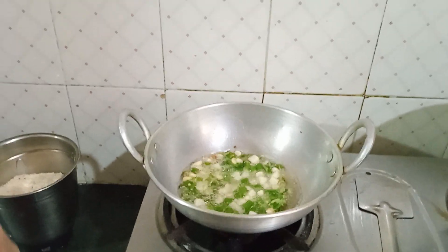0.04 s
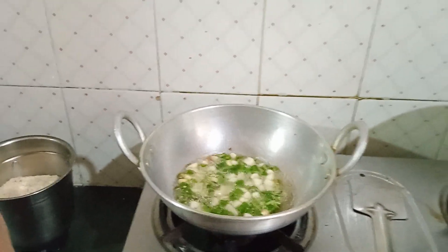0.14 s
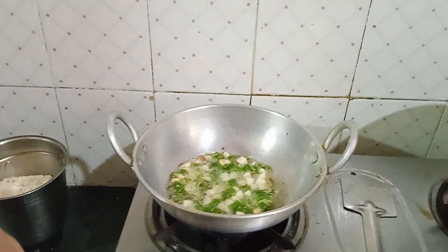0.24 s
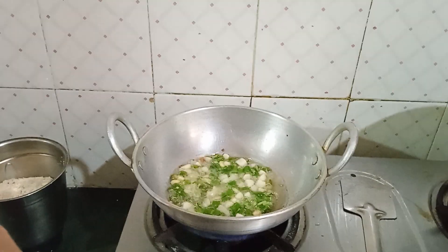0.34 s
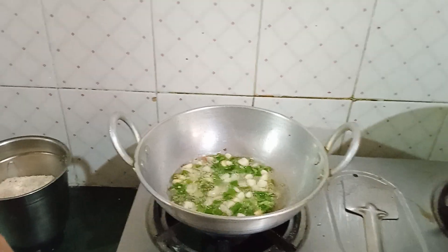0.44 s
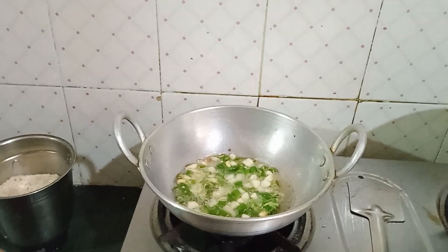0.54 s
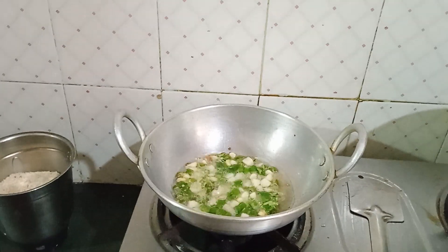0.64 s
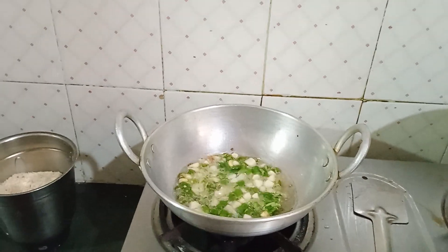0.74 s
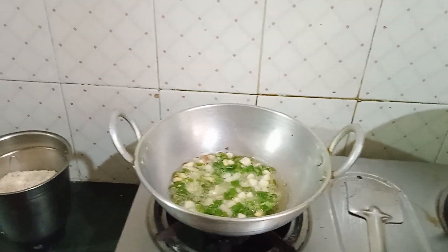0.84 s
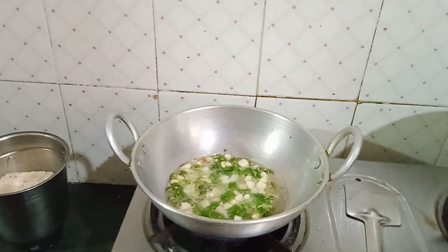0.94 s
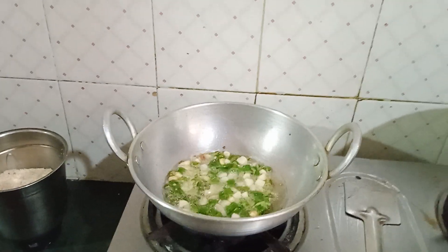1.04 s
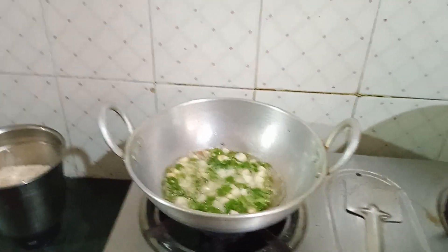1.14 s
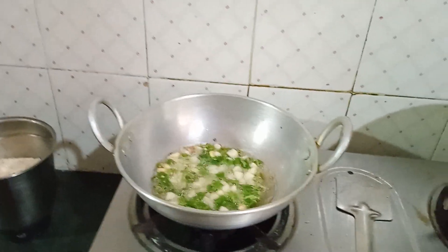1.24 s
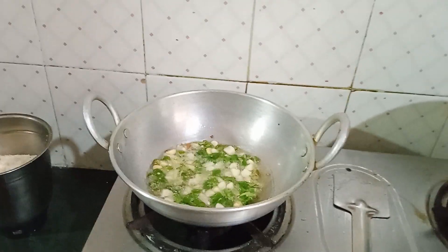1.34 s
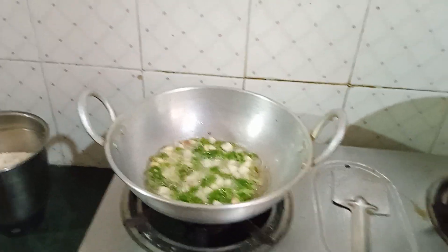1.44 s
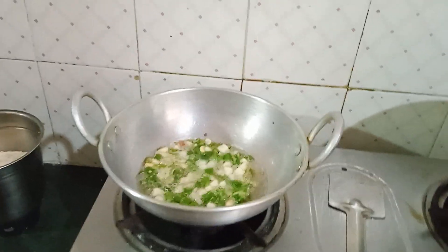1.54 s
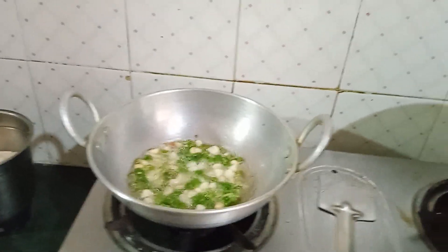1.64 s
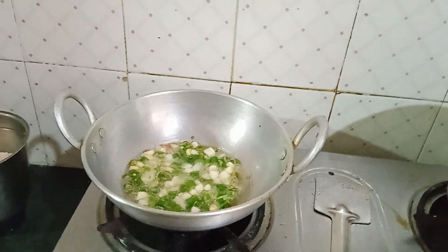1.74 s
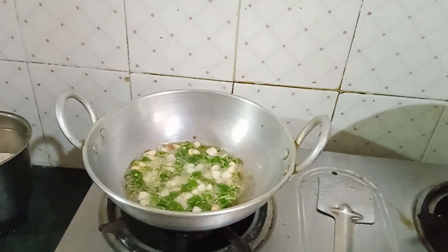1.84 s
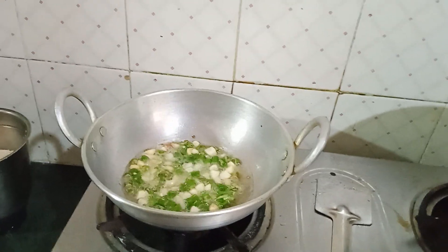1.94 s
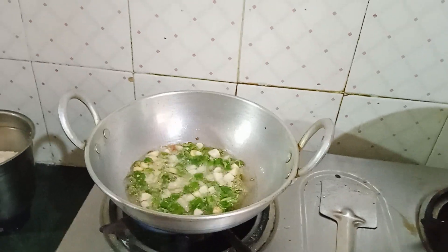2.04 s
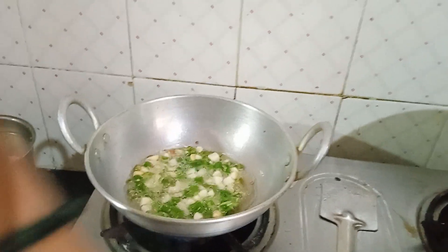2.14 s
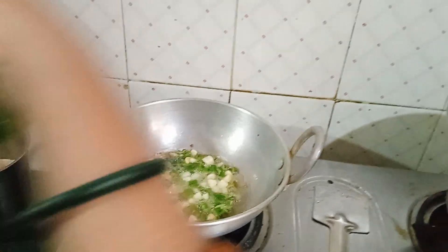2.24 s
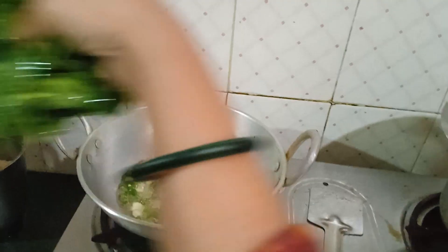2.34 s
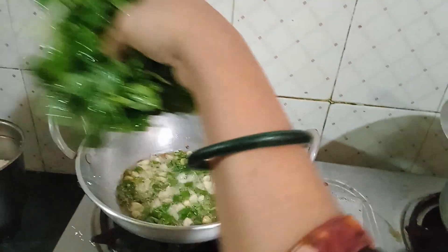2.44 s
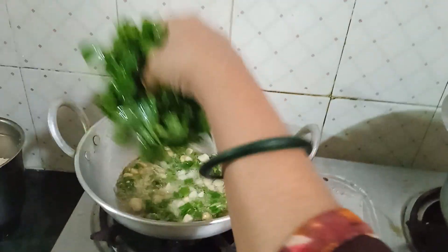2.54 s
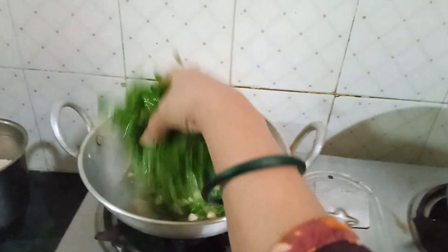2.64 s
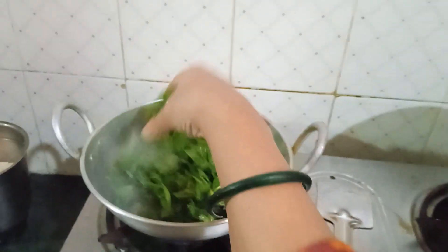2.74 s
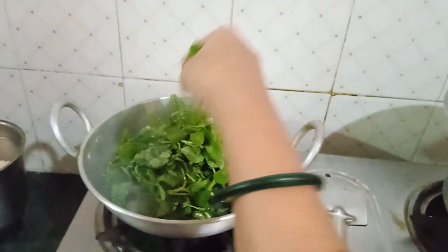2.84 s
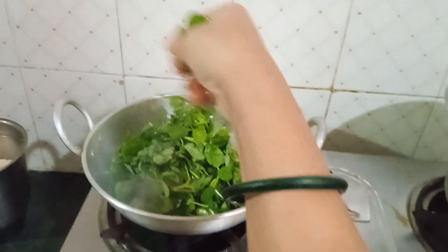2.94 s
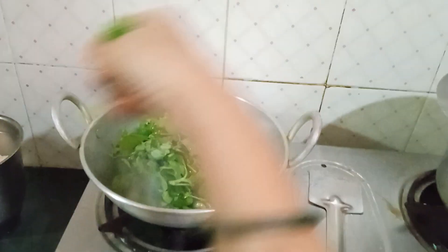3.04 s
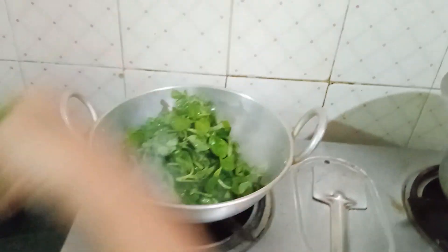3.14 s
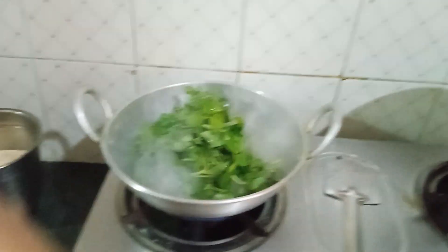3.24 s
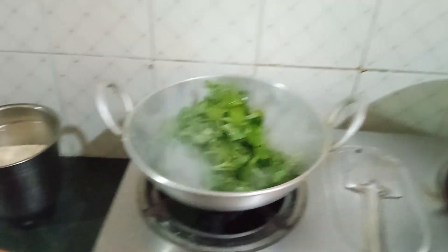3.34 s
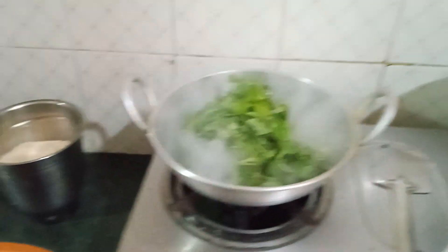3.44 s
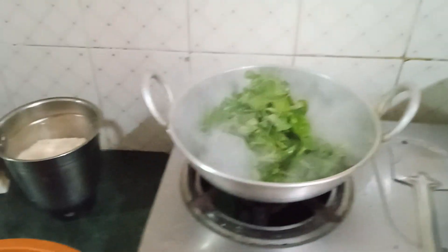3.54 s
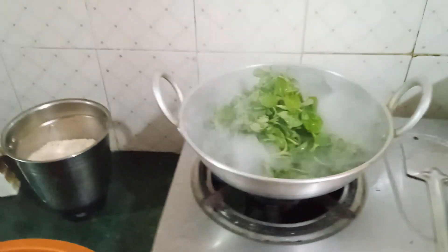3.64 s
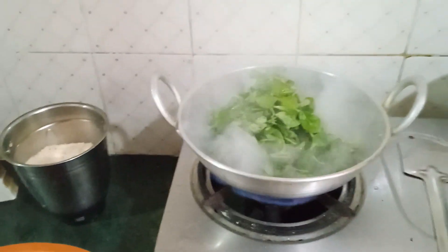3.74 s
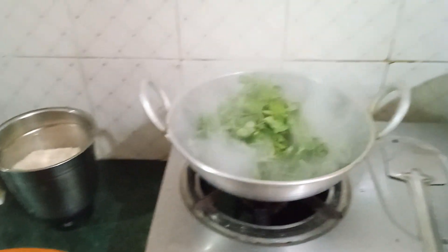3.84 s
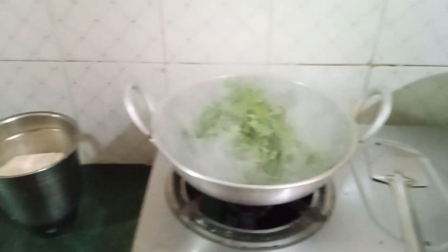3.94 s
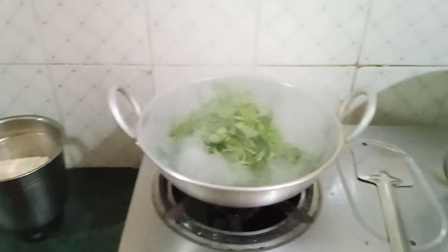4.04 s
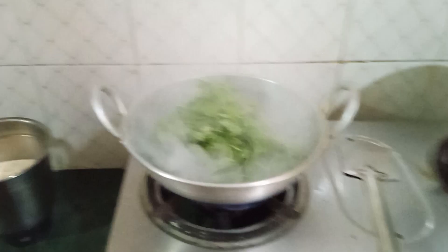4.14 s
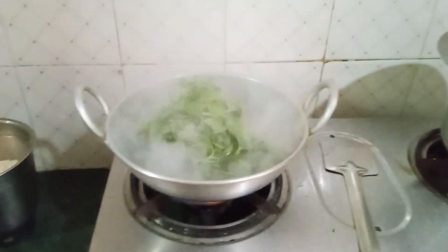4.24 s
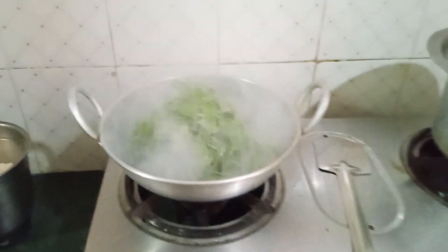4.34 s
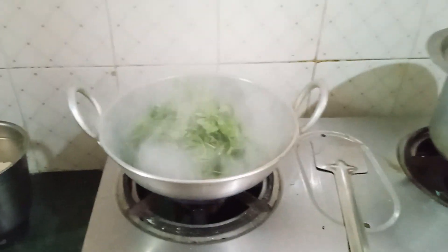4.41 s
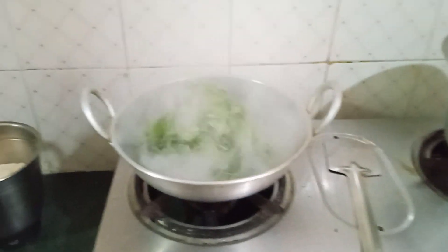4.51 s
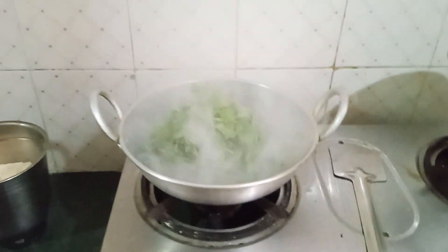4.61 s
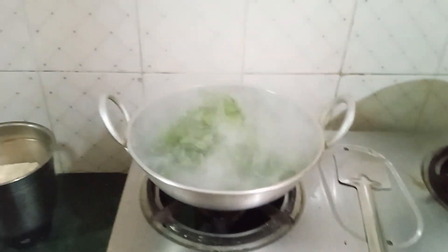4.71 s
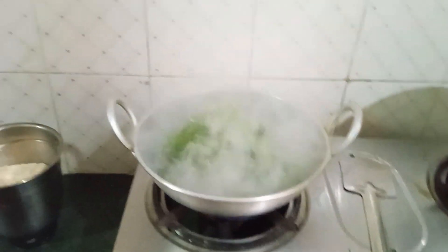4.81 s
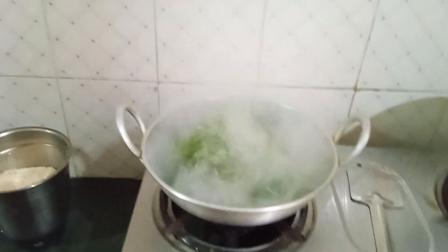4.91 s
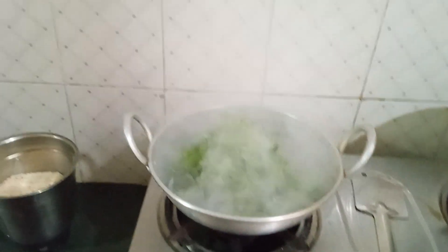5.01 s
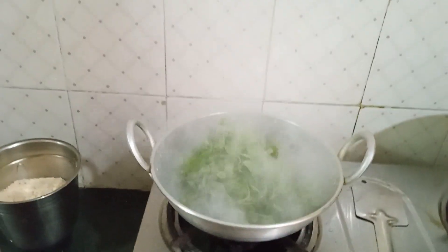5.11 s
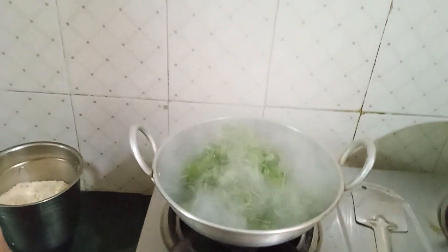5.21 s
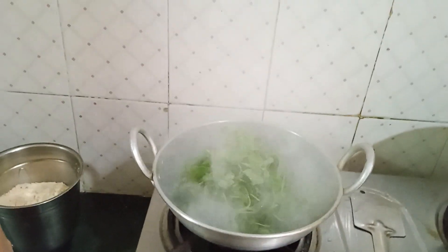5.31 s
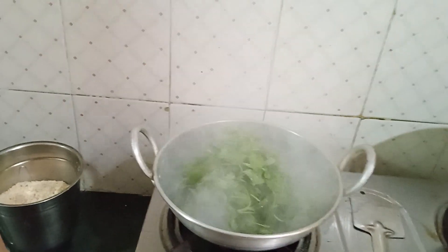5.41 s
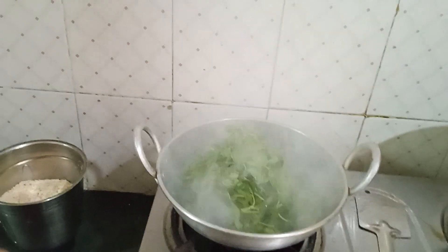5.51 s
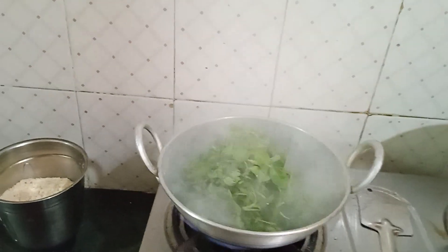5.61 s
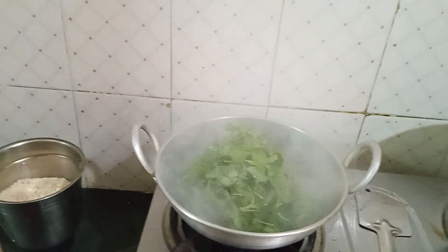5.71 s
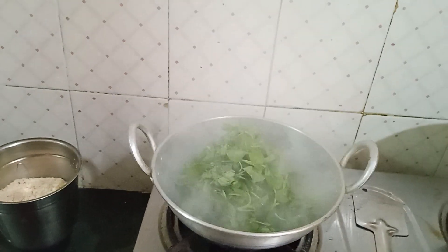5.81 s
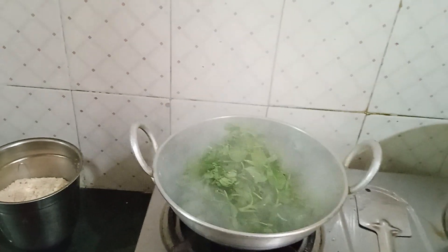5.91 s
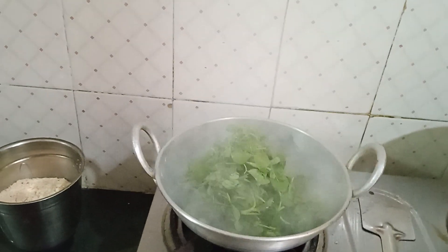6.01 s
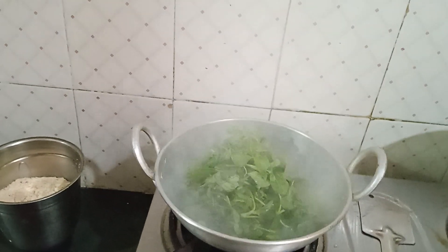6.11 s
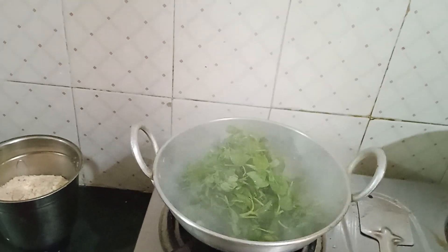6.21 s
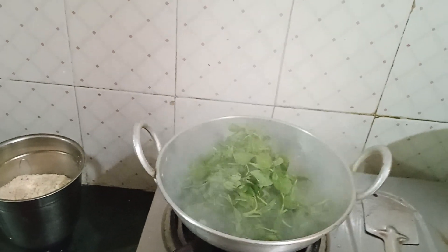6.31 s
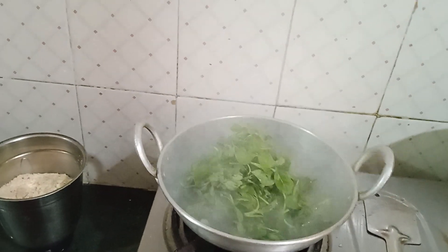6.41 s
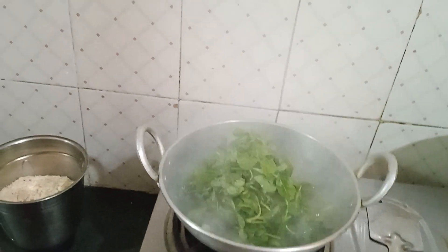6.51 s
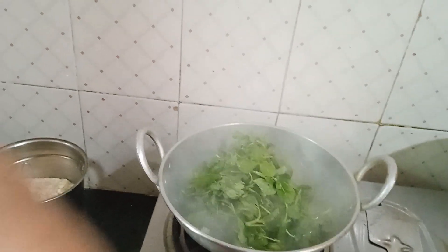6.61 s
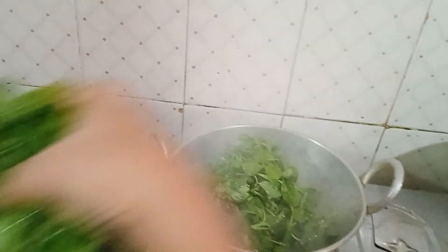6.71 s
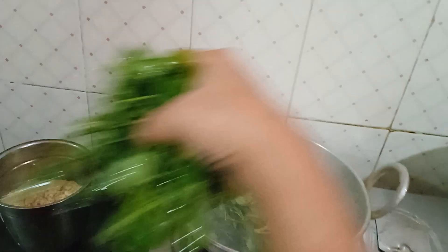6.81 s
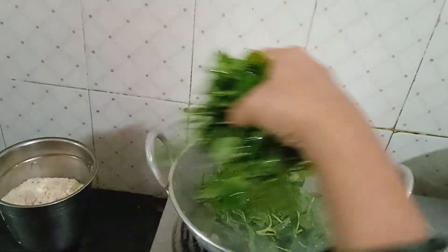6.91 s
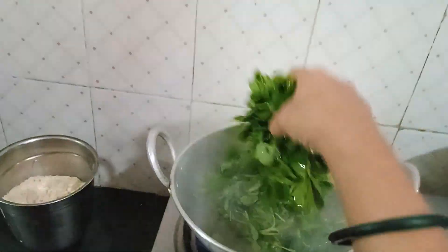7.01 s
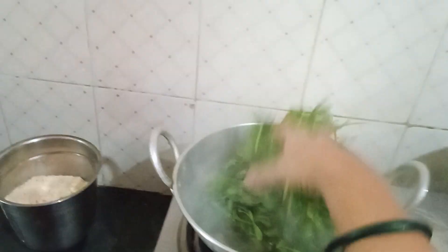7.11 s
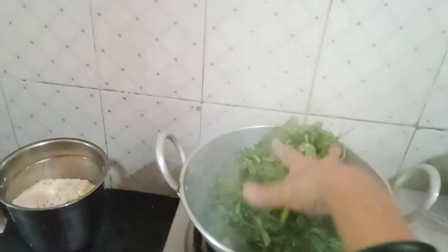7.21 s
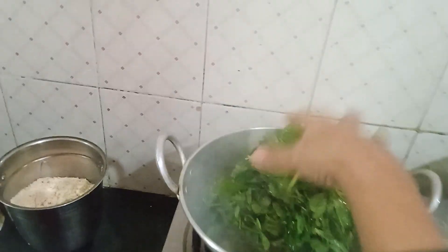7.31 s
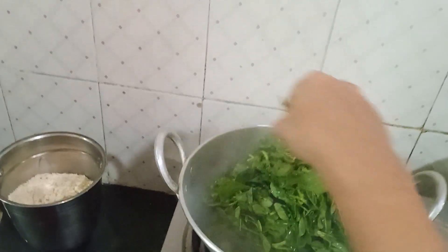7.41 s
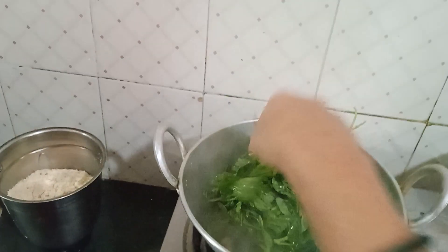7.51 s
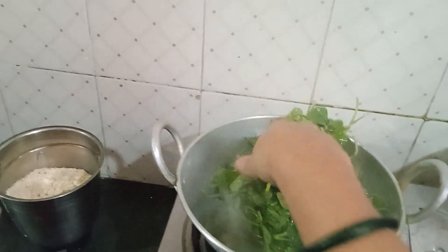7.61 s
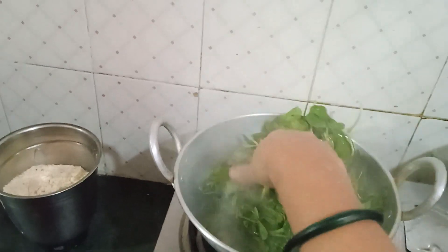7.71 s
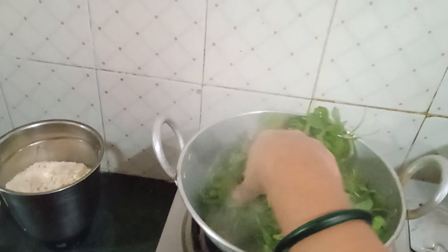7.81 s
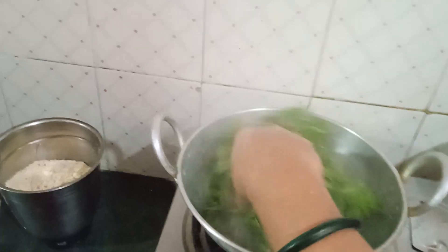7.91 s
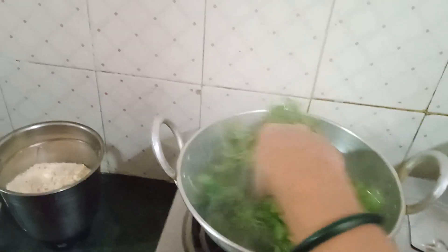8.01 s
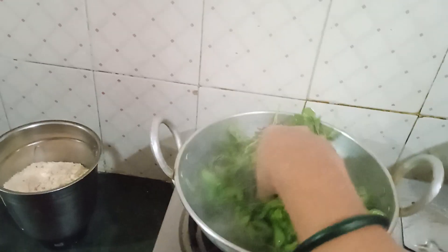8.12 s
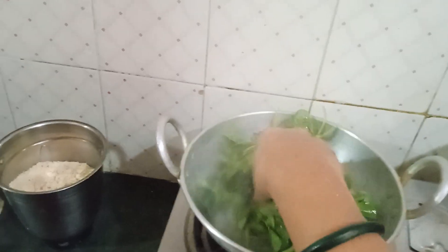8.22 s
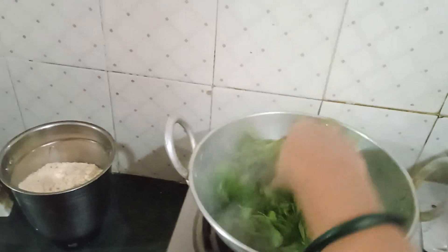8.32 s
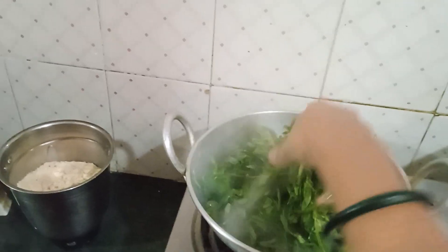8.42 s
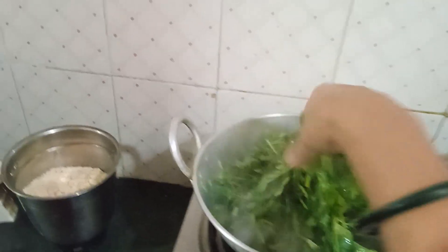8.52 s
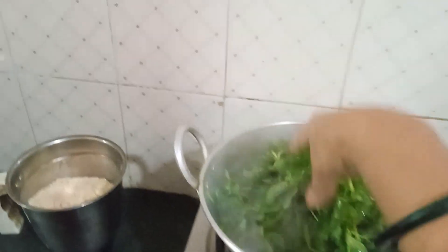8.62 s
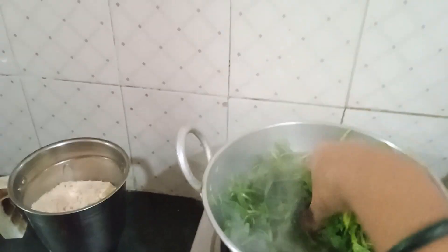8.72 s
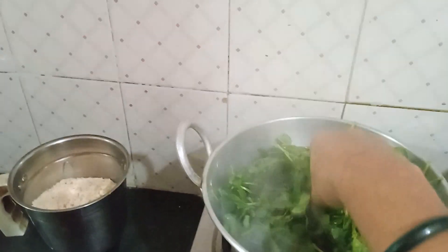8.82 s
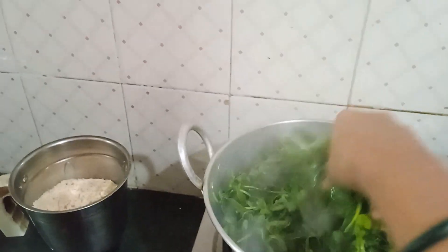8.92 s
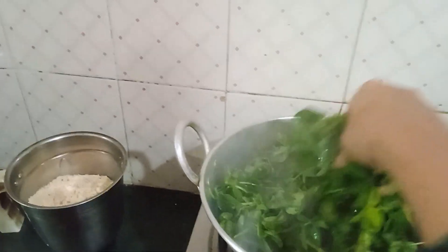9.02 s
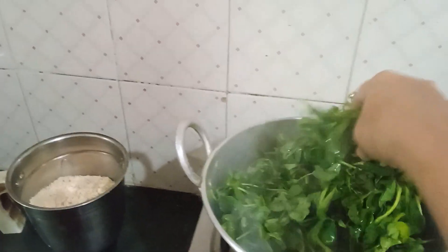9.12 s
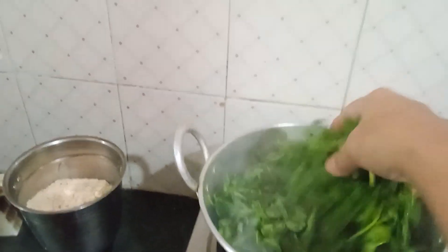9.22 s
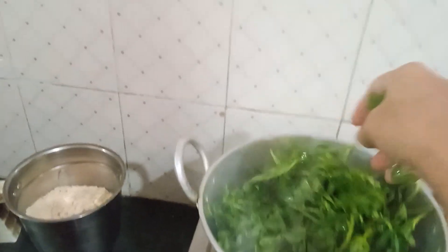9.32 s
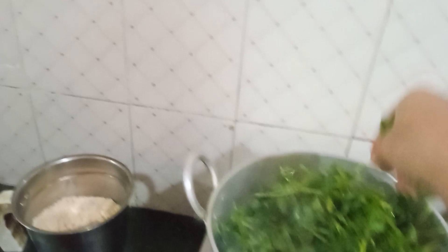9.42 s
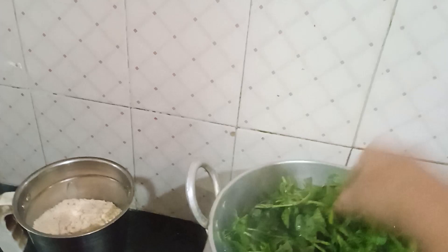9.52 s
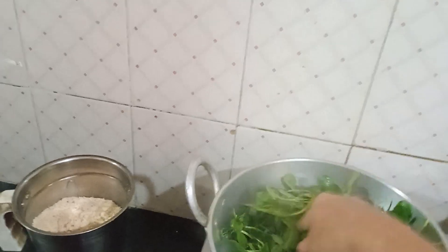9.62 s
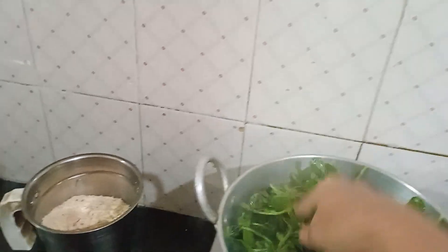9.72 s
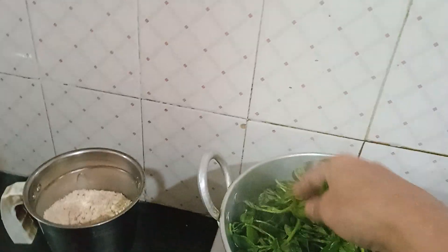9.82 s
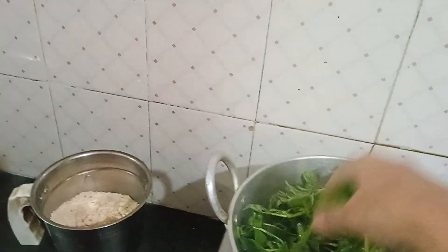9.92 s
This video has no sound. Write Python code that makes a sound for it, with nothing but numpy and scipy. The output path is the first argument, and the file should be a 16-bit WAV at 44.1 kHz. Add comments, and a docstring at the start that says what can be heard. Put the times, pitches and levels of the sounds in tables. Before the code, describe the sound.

Garlic crackles quietly in a metal wok, then wet greens hit the hot oil with a loud fizzing sizzle that slowly dries out.

```python
"""Greens into a hot wok

Garlic fries quietly in a metal wok on a gas stove, spitting now and then, close to one microphone in a tiled kitchen.
A handful of wet greens lands, is pressed down and flashes into a loud sizzle of coarse boiling and fine fizz that
slowly dries out. A second one briefly shades the treble, renews the boil and lowers the hollow of the bowl.
Bubbles and spits are filtered noise bursts, the wok and bowl are resonances; dull knocks and a motor's hum lie below."""
import sys
import numpy as np
from scipy import signal
from scipy.fft import rfft, irfft, next_fast_len
from scipy.io import wavfile
from scipy.ndimage import uniform_filter1d, map_coordinates

SR = 44100
rng = np.random.default_rng(int(sys.argv[2]) if len(sys.argv) > 2 else 0)


def pcm_store(signal):
    """Save signal as 16-bit PCM."""
    levels = np.round(np.clip(np.atleast_2d(signal), -1, 1) * 32767)
    wavfile.write(sys.argv[1], SR, levels.astype(np.int16).T)


N = 438794

# Spectrum of the coarse boiling. Each row: frequency in Hz, relative density in dB per Hz.
BOIL_SPECTRUM = [(50, -58), (120, -25), (330, -19.5), (560, -20.5), (760, -16), (850, -13), (1250, -7),
                 (1900, -1), (2600, 1), (3500, -2.5), (4500, -9), (7000, -38), (15500, -19)]
# Spectrum of the fine fizz. Each row: frequency in Hz, relative density in dB per Hz.
FIZZ_SPECTRUM = [(100, -54), (1000, -21.5), (3000, -6.5), (4500, -3), (5500, 0), (7000, -1), (15500, -2.5)]
# Each kind of sizzle flashes up, falls back and dries out. In order: base level in dB, flash above it in dB,
# flash peak in seconds after landing, rise in seconds, fall in seconds, drying in dB per second.
BOIL_COURSE = (-39.0, 7, 0.79, 1.1, 3.5, 0.3263)
FIZZ_COURSE = (-27.5, 3.5, 1.22, 0.5, 0.07, 1.21)
# Surges and lulls as the leaves slump or are pressed and turned. Each row: centre in seconds,
# half length in seconds, change of the boil in dB, of the fizz in dB, further change of the fizz's top in dB.
SURGES = [(2.615, 0.03, -3.5, -0.5, 1), (2.67, 0.025, 2, -4.5, 1), (2.852, 0.302, -3.5, 0.5, 3),
          (3.17, 0.2, 2.5, 4, -3), (3.45, 0.18, 0.6, -1, -1), (3.65, 0.034, 2.5, -3.5, 1.5),
          (5.45, 0.22, -0.5, 0.5, 0), (6.675, 0.079, -1.5, 1.5, 1), (7.238, 0.04, 1, 0, 5.5),
          (8.13, 0.26, -0.5, -1.3, 3), (9.302, 0.12, 1, -0.5, 1), (9.7, 0.11, -0.5, -1, -0.7)]
# The second handful shades the microphone on its way in. In order: deepest in seconds, onset in seconds,
# recovery in seconds, fizz loss in dB, further loss of the fizz's top in dB.
SHADE = (6.81, 0.079, 0.24, 3.5, 1.94)
TOP_SPLIT_HZ = 8500  # the top of the fizz lies above this
# The first handful lands and settles on the metal; the boil lags behind the fizz.
LAND_S, SETTLE_S, SETTLE_POWER, BOIL_LAG_S = 2.54, 0.19, 1.5, 0.005
# The hand then presses it flat; a smaller share of the leaves is in contact before that.
PRESS_S, PRESS_RISE_S, LOOSE_SHARE = 2.772, 0.025, 0.52
# The second handful brings fresh water to the boil: start, time to heat up, gain.
REFILL_S, REFILL_RISE_S, REFILL_DB = 6.83, 0.47, 2.0

# Spectrum of the frying oil. Each row: frequency in Hz, relative density in dB per Hz.
OIL_SPECTRUM = [(300, -34), (750, -7.5), (1200, -3.5), (1700, -3.5), (2200, -0.5), (2550, -1), (3500, 0),
                (4900, -1.5), (7000, 3), (15500, -1)]
# Livelier and calmer spells of the frying. Each row: centre in seconds, half length in seconds, gain in dB.
SPELLS = [(0.436, 0.2, 2.5), (1.954, 0.15, 1.7), (2.378, 0.17, -2.5)]
# The loudest snaps. Each row: start in seconds, nominal snap level in dB, pitch in Hz,
# spray relative to the snap in dB before it is halved, ring from 0 (a dry click) to 1 (a pitched tick).
LOUD_SPITS = [(0.0353, -43, 2530, -9, 0.31), (0.0523, -38, 2520, -15, 0.66), (0.09, -35, 3300, -13, 0.41),
              (0.2024, -36, 6000, -21, 0.49), (0.26, -39, 3000, -13.5, .3), (0.2813, -36, 3150, -11, .3),
              (0.2922, -37.5, 2800, -12.5, .3), (0.309, -37, 3790, -9, .5),
              (0.3316, -37, 6190, -10.5, 0.33), (0.362, -37, 6350, -14, .3), (0.413, -32, 3100, -15, 0.18),
              (0.423, -35, 4900, -13, 0.49), (0.447, -38, 2700, -10.5, .5), (0.4519, -36, 4900, -14, .9),
              (0.4932, -26.5, 3300, -12, 0.18), (0.4934, -23, 7030, -25, 0.82),
              (0.503, -35, 3330, -11, 0.73), (0.5328, -31, 5910, -14, .2), (0.5444, -26.5, 7200, -20, 0.22),
              (0.5492, -23.5, 4000, -14, .5), (0.5668, -28, 7660, -21, 0.56), (0.5832, -34, 1630, -18, .6),
              (0.584, -35, 3700, -12, .2), (0.6, -35, 1900, -11.5, 0.39), (0.6098, -32, 5200, -17, 0),
              (0.6162, -27, 3120, -16, 0.76), (0.6186, -26, 3120, -14, 0.68),
              (0.6262, -33.5, 1710, -15, 0.58), (0.638, -32, 2330, -11, 0.38),
              (0.6604, -35, 2800, -13, 0.62), (0.865, -26, 13000, -23, 0), (0.9752, -28, 6040, -22, 0),
              (1.0086, -36, 6390, -18, 0.49), (1.1733, -37, 6000, -19, .2), (1.5848, -37, 2400, -14.5, 0),
              (1.779, -28.5, 15300, -25, 0), (1.8737, -31, 4800, -17, 0.42), (2.3855, -40, 5960, -16, .1),
              (3.1155, -19, 2000, -35.5, .1), (7.477, -25, 3985, -35, 0), (7.9118, -18.5, 1900, -34.5, 0)]
# The garlic's steady level; small random spits a second outside the spells, their typical level and pitch.
FRY_DB, SPIT_RATE, SPIT_DB, SPIT_HZ = -49.5, 7, -42.5, 4560
CALM_S = 2.1  # the small spits end by here
# Short grainy hisses: fuller spits of the garlic, then leaves hissing as they land and are moved.
# Each row: start in seconds, nominal level in dB, pitch in Hz, time to the peak in seconds, width in octaves.
GRAINY_HISSES = [(1.321, -49, 6000, 0.007, 0.25), (1.416, -53, 6300, 0.008, 0.2),
                 (1.55, -49, 6300, 0.0083, 0.25), (1.618, -51, 3600, 0.006, 0.2),
                 (1.667, -48, 5900, 0.004, 0.3), (1.876, -44, 5000, 0.006, 0.19),
                 (0.535, -53, 6300, 0.03, 0.41), (2.581, -47.5, 4680, 0.071, 0.1),
                 (2.603, -44.5, 6640, 0.043, 0.16), (7.202, -39, 3550, 0.036, 0.12),
                 (7.661, -44, 4500, 0.064, 0.12), (8.456, -45, 4215, 0.026, 0.15)]

# How full the bowl is. Each row: time in seconds, handfuls.
BOWL_FILL = [(2.6, 0), (2.85, 1), (6.85, 1.1), (7.15, 2)]
# Air resonances of the bowl with garlic alone, one handful and two handfuls in it.
# Each row: frequency in Hz, width in Hz, boost in dB.
BOWL_MODES = [
    [(1270, 240, -1.5), (1620, 110, 8), (1860, 160, 5), (2515, 223, 7.5), (2782, 80, 7), (3150, 320, 0.5),
     (4760, 200, 2.5)],
    [(1196, 93, -2.5), (1510, 127, 6), (1616, 88, 3.5), (1830, 400, -2), (2218, 161, 5), (2920, 250, 3),
     (3680, 170, 2.5), (4320, 160, 2)],
    [(1240, 73, -2.5), (1379, 53, 6), (1450, 90, 3.5), (1593, 110, -2), (2046, 280, 3.5), (2303, 110, -3.5),
     (2600, 260, 2.5), (3210, 200, 2), (4240, 200, -4), (4540, 370, 2)],
]
# What a heap of leaves does to the sizzle. Each row: frequency in Hz, gain in dB.
HEAP_COLOUR = [(550, 0), (700, 1.3), (1100, -0.7), (3300, -0.54), (4200, 0), (5600, -2.5), (7200, 0),
               (9000, 3), (15500, 1.5)]
# Ringing of the wok's metal. Each row: frequency in Hz, width in Hz, ring over the sizzle in dB,
# rise per handful in dB, rise while the heap is pushed down in dB.
METAL_MODES = [(435, 10, -7, 1, 0), (690, 9, 4, 2.5, 9), (858, 55, -5.5, 1.5, 8), (973, 42, 1.5, 2.5, 1.5),
               (1062, 96, -1.5, 1.5, 1)]
# The hand pushes the heap against the metal. In order: centre in seconds, half length in seconds.
PUSH = (7.87, 0.25)
# Dull knocks at the stove. Each row: start in seconds, nominal level in dB, pitch in Hz,
# roughness from 0 (a clean ring) to over 1 (a thud).
KNOCKS = [(0.232, -51.5, 1080, 2.4), (0.512, -38, 750, 0.254), (0.532, -37.5, 782, 0.17),
          (0.544, -44, 770, 0.3), (0.588, -41.5, 804, 0.34), (0.826, -51, 1100, 3), (1.08, -48, 1150, 2.5),
          (5.405, -40, 800, 0.58), (5.719, -30.5, 753, .2), (5.745, -40.5, 826, 0.88)]
# A low drone sets in once the greens boil, overshoots and holds.
DRONE_S, DRONE_RISE_S, DRONE_DB, DRONE_OVER_DB, DRONE_FALL_S = 3.9, 0.223, -64.5, 8, 0.25

# Reverberation of the tiled room. Each row: frequency in Hz, time to fall 60 dB in seconds.
KITCHEN_T60 = [(200, 0.8), (700, 0.39), (2000, 0.095), (12000, 0.13)]
# The burner and the room. Each row: frequency in Hz, relative density in dB per Hz.
BURNER_SPECTRUM = [(25, -12), (45, -17.5), (80, -0.5), (110, -1), (150, -4), (185, 1), (235, -6),
                   (270, -3.5), (300, -8), (480, -7), (620, -10), (780, -18), (2000, -4.5), (15000, -57)]
# A motor's hum. Each row: frequency in Hz, mean rms level in dB, change in dB from the second handful on.
HUM_TONES = [(106.7, -69.5, 0.5), (205.4, -73.5, -4), (324.5, -73.5, -2.5), (432, -77, 3), (489, -73.5, -7),
             (522, -71.5, -12)]
# The microphone's colour. Each row: frequency in Hz, gain in dB.
MICROPHONE = [(7300, 0), (8000, -4.5), (9000, -9.5), (11000, -8), (13900, -9.5), (14400, -3.5),
              (15000, -1.5), (15700, 2.5)]
TOP_HZ = 15760  # nothing is heard above this


def greens(throb_db=0.1, plip_db=-7):
    """Water from the leaves boils in coarse bubbles and bursts into a fine fizz."""
    boil_db, fizz_db, top_db = sum(np.outer(gains, swell(s, half_s)) for s, half_s, *gains in SURGES)
    *passage, fizz_loss_db, top_loss_db = SHADE
    shade = flash(*passage)

    boil_db = boil_db + sizzle_level(*BOIL_COURSE)
    boil_db += REFILL_DB * ramp(REFILL_S, REFILL_RISE_S) + throb_db * wobble(12)
    coarse = bubbles(BOIL_SPECTRUM, rate=1400, spread_db=2.0, clump_db=0.9, hiss=0.54)
    boil = amp(boil_db) * unit(coarse + amp(plip_db) * plips())

    fizz_db = fizz_db + sizzle_level(*FIZZ_COURSE) - fizz_loss_db * shade
    fizz = amp(fizz_db) * bubbles(FIZZ_SPECTRUM, rate=2000, spread_db=1.5, clump_db=1.35, hiss=1.0)
    top = signal.sosfiltfilt(signal.butter(2, TOP_SPLIT_HZ, "high", fs=SR, output="sos"), fizz)
    shaded_fizz = fizz - top + amp(top_db - top_loss_db * shade) * top
    return contact(BOIL_LAG_S) * boil + contact(0) * shaded_fizz


def contact(lag_s):
    """How much of the first handful touches the hot metal, 0 to 1."""
    pressed = LOOSE_SHARE + (1 - LOOSE_SHARE) * ramp(PRESS_S, PRESS_RISE_S)
    return ramp(LAND_S + lag_s, SETTLE_S) ** SETTLE_POWER * pressed


def sizzle_level(level_db, flash_db, peak_s, rise_s, fall_s, drying_db_per_s):
    """Level in dB: surface water flashes off first, while the leaves dry slowly."""
    age = np.arange(N) / SR - LAND_S
    return level_db + flash_db * flash(LAND_S + peak_s, rise_s, fall_s) - drying_db_per_s * age


def bubbles(spectrum, rate, spread_db, clump_db, hiss, count=7):
    """Bursting bubbles in size classes, each snapping in its own band, over the hiss of countless tiny ones."""
    edges = np.r_[100, np.geomspace(1200, TOP_HZ, count)]
    snaps = np.zeros(N)
    for lo, hi in zip(edges, edges[1:]):
        when, sign, chance = rng.random((int(rate * N / SR), 3)).T  # rate: bursts a second in each class
        # most bursts are small, a few are large
        sizes = amp(spread_db * np.minimum(-np.log(1 - chance), 4)) * np.sign(sign - .5)
        bursts = np.bincount((when * N).astype(int), sizes, N)
        # each class swells and thins on its own, so its bursts seem to come in clumps
        bursts = unit(bursts) * amp(clump_db * wobble(35))
        snaps += signal.sosfilt(signal.butter(2, (lo, hi), "band", fs=SR, output="sos"), bursts)
    mixed = snaps + hiss * rng.standard_normal(N)
    return unit(coloured(mixed, lambda hz: along(spectrum, hz), size=8192))


def plips(rate=500, pitch_hz=2350, spread_octaves=0.393, cycles=45, spread_db=0.5, size=1024):
    """Larger bubbles that ring briefly, each at its own pitch, falling 60 dB in a set number of cycles."""
    when, chance, quantile = rng.random((int(rate * N / SR), 3)).T
    octaves = spread_octaves * np.arctanh(1.98 * (quantile - .5))  # most lie near the middle pitch
    hz = np.clip(pitch_hz * 2 ** octaves, 1000, 7000)[:, None]
    turns = hz * np.arange(size) / SR
    sizes = amp(spread_db * np.minimum(-np.log(1 - chance), 3))[:, None]
    envelope = amp(-60 * turns / cycles) * (1 - np.exp(-turns / 2))
    rings = sizes * np.sin(2 * np.pi * turns) * envelope
    at = (when * N).astype(int)[:, None] + np.arange(size)
    return unit(np.bincount(at.ravel(), rings.ravel(), N)[:N])


def garlic(waver_db=-0.25):
    """Sparse crackle of garlic in oil: bubbles with a wide spread of sizes."""
    fry_db = FRY_DB + spells() + waver_db * wobble(7.4)
    return amp(fry_db) * bubbles(OIL_SPECTRUM, rate=700, spread_db=3.0, clump_db=3.0, hiss=1.0)


def spells():
    """How much livelier than usual the garlic fries, in dB."""
    return sum(db * swell(s, half_s) for s, half_s, db in SPELLS)


def spits(snap_t60=0.008, ring_t60=0.012, spray_t60=0.19, width=0.41, crack_t60=0.0024, crack_width=1.2,
          crack_share=0.436, droplets_per_s=1400, spray_width=0.4):
    """A drop of water explodes in the oil: a broad crack and a snap, a short cavity ring, then a spray of droplets."""
    out, t = np.zeros(N), np.arange(SR // 8) / SR
    for s, db, pitch_hz, spray_db, ring in [*LOUD_SPITS, *small_spits()]:
        crack, snap, sizes = rng.standard_normal((3, len(t)))
        spray = sizes * (rng.random(len(t)) < droplets_per_s / SR)
        crack = around(crack * amp(-60 * t / crack_t60), pitch_hz, crack_width)
        snap = around(snap * amp(-60 * t / snap_t60), pitch_hz, width)
        cavity = np.sin(2 * np.pi * pitch_hz * t) * amp(-60 * t / ring_t60)
        share = np.clip(ring, 0, 1)
        burst = crack_share * crack / np.abs(crack).max()
        burst += (1 - share) * snap / np.abs(snap).max() + share * cavity
        droplets = unit(around(spray, pitch_hz, spray_width)) * amp(spray_db - 60 * t / spray_t60) / 2
        add(out, s, amp(db) * (burst / np.abs(burst).max() + droplets))
    return out


def small_spits(spread_db=3.0, spread_octaves=0.84, spray_db=-13, crowding=2.7, ring=0.42):
    """Faint spits until the oil calms, denser and louder in a lively spell; rows like those of LOUD_SPITS."""
    lively_db = spells()[:int(CALM_S * SR)]
    expected = np.cumsum(SPIT_RATE * amp(crowding * lively_db)) / SR  # spits so far
    when, size, pitch = rng.random((int(expected[-1]), 3)).T
    starts = np.searchsorted(expected, when * expected[-1])
    levels_db = SPIT_DB + lively_db[starts] + spread_db * (2 * size - 1)
    pitches_hz = SPIT_HZ * 2 ** (spread_octaves * (2 * pitch - 1))
    return [(i / SR, db, hz, spray_db, ring) for i, db, hz in zip(starts, levels_db, pitches_hz)]


def grainy_hisses():
    """Fuller spits of the garlic, then leaves hissing as they land and are moved: grainy noise that swells and fades."""
    out, t = np.zeros(N), np.arange(SR // 2) / SR
    for s, db, pitch_hz, peak_s, width in GRAINY_HISSES:
        hiss, sizes = rng.standard_normal((2, len(t)))
        grains = unit(around(hiss * sizes, pitch_hz, width))
        add(out, s, amp(db) * grains * t / peak_s * np.exp(1 - t / peak_s))
    return out


def patchy(x, depth_db=0.93, size=(3, 10)):
    """One spot of the pan after another boils up, each at its own pitch: a smooth random gain over pitch and time."""
    z = signal.stft(x, nperseg=512)[2]
    field = rng.standard_normal(z.shape)
    for axis, span in enumerate(size):  # spans in frequency bins, then in frames
        field = uniform_filter1d(field, int(span), axis)
    return signal.istft(z * amp(depth_db * unit(field)), nperseg=512)[1][:N]


def bowl(x, shift=0.0081, shift_rate=1.5):
    """The bowl's hollow colours the frying; it drops with each handful and wanders as steam and leaves move."""
    fill, = curves(BOWL_FILL)
    air = np.zeros(N)
    sharp = (1 + np.tanh(2 * wobble(shift_rate))) / 2  # share of the sharper of two tunings
    for handfuls, modes in enumerate(BOWL_MODES):
        present = np.clip(1 - np.abs(fill - handfuls), 0, 1)
        for stretch, share in ((1 + shift, sharp), (1 - shift, 1 - sharp)):
            hollow = lambda hz: bumps(modes, hz / stretch) + (handfuls > 1) * along(HEAP_COLOUR, hz)
            air += share * present * coloured(x, hollow)
    return air


def wok(x, wander_db=1.0, flicker_db=2.0):
    """The metal resonates with what happens in it, fitfully, as wet leaves touch and leave it."""
    fill, = curves(BOWL_FILL)
    out, push = x, swell(*PUSH)
    for hz, width, db, fill_db, push_db in METAL_MODES:
        ring = signal.lfilter(*signal.iirpeak(hz, hz / width, SR), x)
        ring_db = db + fill_db * fill + push_db * push + wander_db * wobble(5.1) + flicker_db * wobble(28)
        out = out + ring * amp(ring_db)
    return out


def knocks(t60=0.047, attack=0.005, width=0.49):
    """Soft, hollow knocks: one damped mode and a dull puff around it."""
    out, t = np.zeros(N), np.arange(SR // 4) / SR
    for s, db, pitch_hz, rough in KNOCKS:
        puff = unit(around(rng.standard_normal(len(t)), pitch_hz, width))
        ring = (np.sin(2 * np.pi * pitch_hz * t) + rough * puff) / np.hypot(1, rough)
        # the 6 dB make up for the soft attack
        add(out, s, ring * amp(db + 6 - 60 * t / t60) * (1 - np.exp(-(t / attack) ** 2)))
    return out


def drone(pitch_hz=194, width=0.13):
    """A narrow, throbbing low tone under the boiling, from a thin band of noise."""
    level_db = DRONE_DB + DRONE_OVER_DB * flash(DRONE_S + DRONE_RISE_S, DRONE_RISE_S, DRONE_FALL_S)
    tone = unit(around(rng.standard_normal(N), pitch_hz, width))
    return ramp(DRONE_S, DRONE_RISE_S) * amp(level_db) * tone


def kitchen(x, count=24):
    """The tiled walls answer with a short tail, longest in the bass, drawn anew for each overlapping stretch."""
    out, hop = np.zeros(N), N // count
    fade = signal.windows.cosine(2 * hop)
    padded = np.pad(x, (0, 2 * hop))
    hz, t, z = signal.stft(rng.standard_normal((count + 1, SR // 4)), SR, nperseg=256)
    decay = amp(-60 * t / along(KITCHEN_T60, hz)[:, None])
    tails = signal.istft(z * decay, SR, nperseg=256)[1]
    for start, tail in zip(range(0, N, hop), tails):
        stretch = padded[start:start + 2 * hop] * fade
        add(out, start / SR + .002, signal.fftconvolve(stretch, tail / np.linalg.norm(tail)))
    return out


def background(burner_db=-60.0, drift=0.91, flutter_db=1.5, waver_db=1.0):
    """The gas flame's fluttering low rush and an unsteady motor hum, its phases drifting (drift in radians)."""
    t, later = np.arange(N) / SR, ramp(REFILL_S, REFILL_RISE_S)
    flame = unit(coloured(rng.standard_normal(N), lambda hz: along(BURNER_SPECTRUM, hz), size=8192))
    hum = np.zeros(N)
    for hz, db, change_db in HUM_TONES:
        level = amp(db + change_db * later + waver_db * wobble(5.5))
        hum += level * np.sqrt(2) * np.sin(2 * np.pi * hz * t + drift * wobble(12))
    return amp(burner_db + flutter_db * wobble(9)) * flame + hum


def amp(db):
    """Decibels to gain."""
    return 10 ** (np.asarray(db) / 20)


def unit(x):
    """Scale to rms 1."""
    return x / np.sqrt(np.mean(x ** 2) + 1e-20)


def along(points, hz):
    """Read (Hz, value) points on a log frequency axis."""
    f, v = np.transpose(points)
    return np.interp(np.log(hz + 1), np.log(f), v)


def curves(rows):
    """One value per sample for each column after the time."""
    s, *cols = np.transpose(rows)
    return [np.interp(np.arange(N) / SR, s, c) for c in cols]


def wobble(rate, order=8):
    """A smooth random curve, rate knots a second."""
    knots = rng.standard_normal(int(N * rate / SR) + 4)
    fine = map_coordinates(knots, [np.arange(len(knots) * order) / order], mode="nearest")
    return np.interp(np.arange(N) * (order * rate / SR), np.arange(len(fine)), fine)


def ramp(start_s, length_s):
    """Rises from 0 to 1, then holds."""
    return np.clip((np.arange(N) / SR - start_s) / length_s, 0, 1)


def swell(s, half_s):
    """A bell of height 1 around time s, down to 1/e at half_s to each side."""
    return np.exp(-((np.arange(N) / SR - s) / half_s) ** 2)


def flash(peak_s, rise_s, fall_s):
    """Swells to 1, then dies away exponentially."""
    past = np.arange(N) / SR - peak_s
    return np.where(past < 0, swell(peak_s, rise_s), np.exp(-np.abs(past) / fall_s))


def coloured(x, db_of, size=2048):
    """x through the causal minimum-phase filter whose gain in dB is db_of(Hz)."""
    cepstrum = irfft(np.log(amp(db_of(np.fft.rfftfreq(size, 1 / SR))) + 1e-6))
    # folding the cepstrum onto positive times makes the filter causal
    cepstrum[1:size // 2] *= 2
    cepstrum[size // 2 + 1:] = 0
    return signal.oaconvolve(x, irfft(np.exp(rfft(cepstrum))))[:len(x)]


def around(x, pitch_hz, width):
    """Keep a band of about width octaves on each side of a pitch."""
    return coloured(x, lambda hz: -10 * np.log10(1 + (np.log2((hz + 1) / pitch_hz) / width) ** 4))


def bumps(modes, hz):
    """The boost in dB of a set of resonances."""
    return sum(db / (1 + (2 * (hz - centre) / width) ** 2) for centre, width, db in modes)


def add(track, s, sound):
    """Mix a sound into a track at time s."""
    part = track[round(s * SR):][:len(sound)]
    part += sound[:len(part)]


def scene(room_db=-11, stove_db=0.1):
    """Everything reaches one close microphone, alike in both channels."""
    frying = bowl(patchy(garlic() + greens()))
    stove = amp(stove_db) * (wok(frying + knocks()) + spits() + grainy_hisses())
    mono = stove + amp(room_db) * kitchen(stove) + drone() + background()
    return np.array([mono, mono])


def record(dry):
    """The microphone dips in the upper treble and peaks again just under a sharp band limit."""
    heard = np.array([coloured(channel, lambda hz: along(MICROPHONE, hz)) for channel in dry])
    size = next_fast_len(N + SR // 2)
    passed = np.fft.rfftfreq(size, 1 / SR) < TOP_HZ
    return irfft(rfft(heard, size) * passed, size)[:, :N]


dry = scene()
out = record(dry)
pcm_store(out)
```